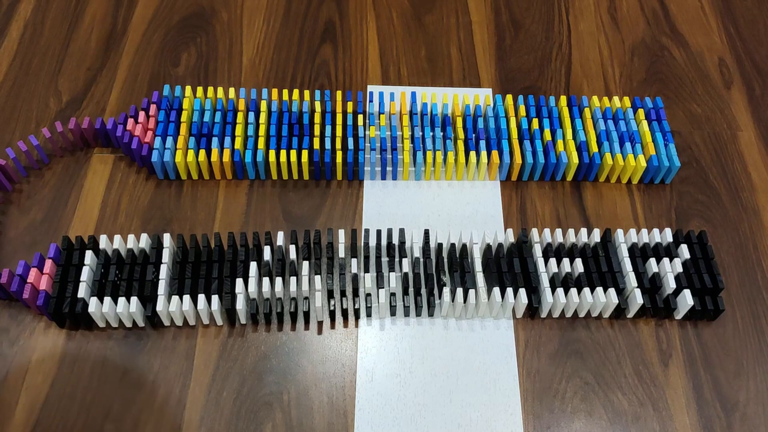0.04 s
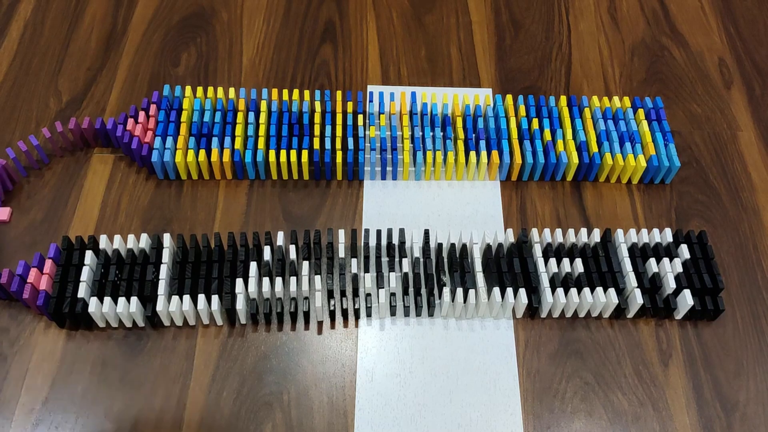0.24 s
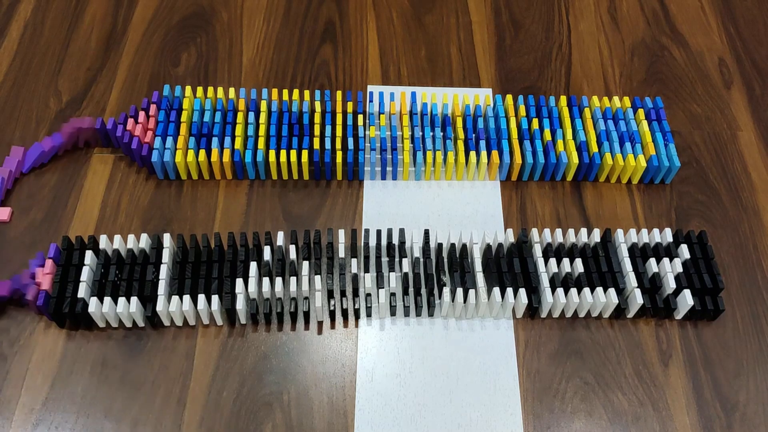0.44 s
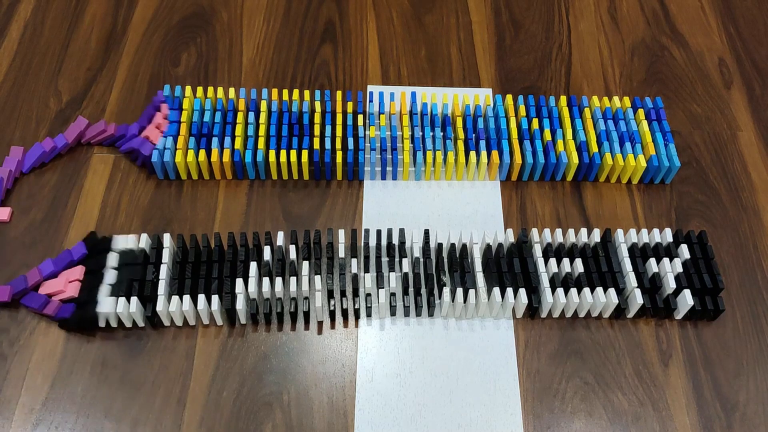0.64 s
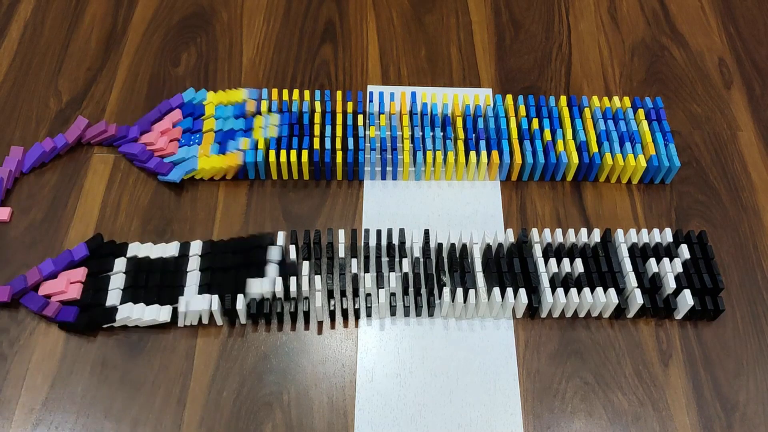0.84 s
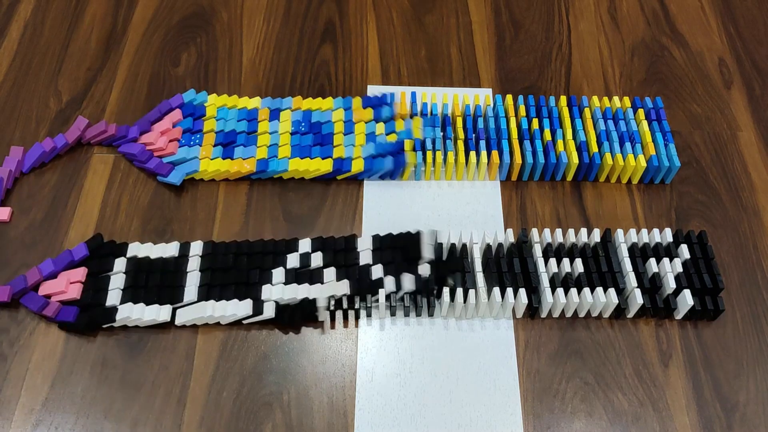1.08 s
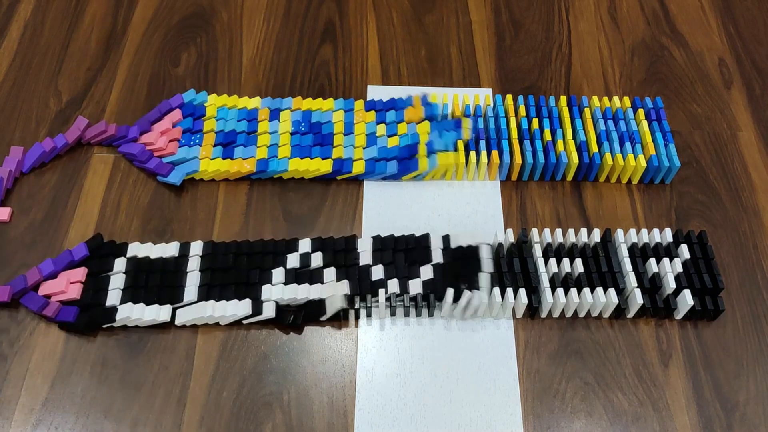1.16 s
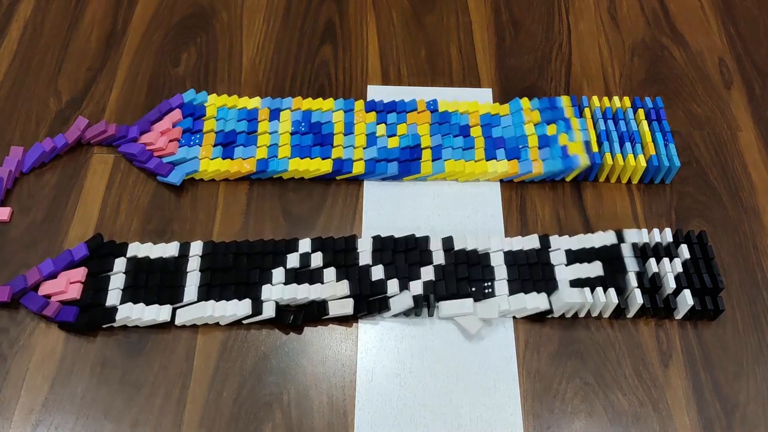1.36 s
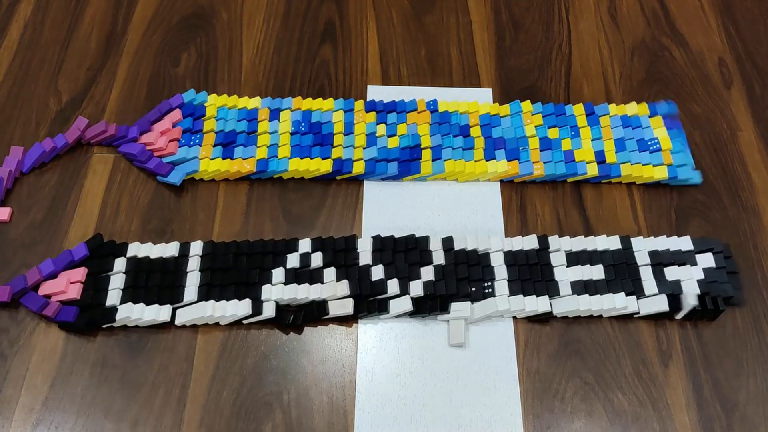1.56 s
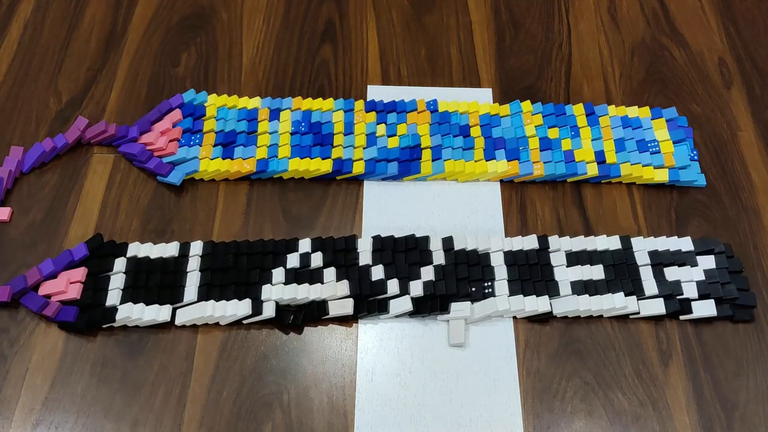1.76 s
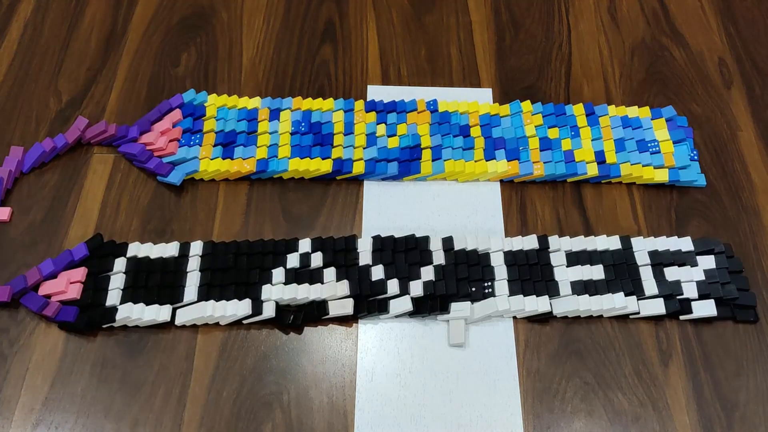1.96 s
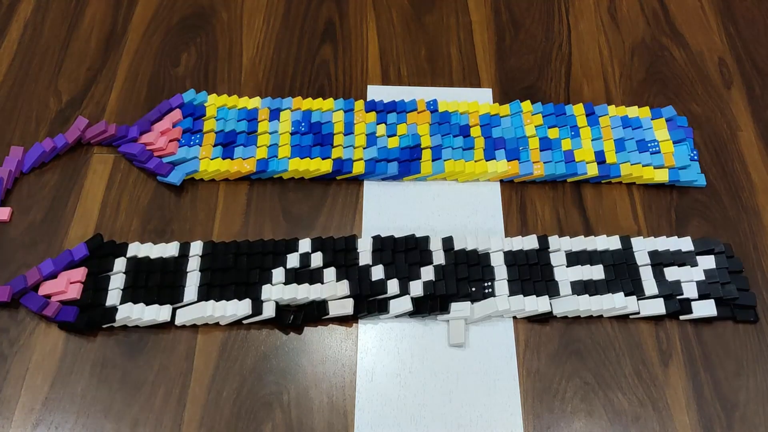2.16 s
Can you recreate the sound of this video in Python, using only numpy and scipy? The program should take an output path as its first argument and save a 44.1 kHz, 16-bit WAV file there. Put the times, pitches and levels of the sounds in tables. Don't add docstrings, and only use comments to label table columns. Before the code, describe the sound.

Near silence, then scattered domino clacks grow into a rushing wave of thousands of sharp plastic ticks and woody knocks, moving slightly from left to right in a live room, before a last tile settles over low rumble.

```python
import sys
import numpy as np
from scipy import signal
from scipy.fft import rfft, irfft
from scipy.io import wavfile
from scipy.ndimage import uniform_filter1d

SR = 44100
rng = np.random.default_rng(int(sys.argv[2]) if len(sys.argv) > 2 else 0)


def attenuation_scalar(level_db):
    decades = np.asarray(level_db, float) / 20
    return 10 ** decades


def bounce(signal):
    frames = np.transpose(np.atleast_2d(signal))
    limited = np.clip(frames, -1, 1)
    pcm = np.round(limited * 32767).astype(np.int16)
    wavfile.write(sys.argv[1], SR, pcm)


N = 98034
TIME = np.arange(N) / SR


def evened(x):
    return x / np.sqrt(np.mean(x ** 2) + 1e-20)


def read(points, hz):
    f, value = np.transpose(points)
    return np.interp(np.log(hz + 1), np.log(f + 1), value)


def curve(table, axis):
    columns = np.transpose(table)
    return np.interp(TIME, columns[0], columns[axis])


def colour(x, points):
    count = x.shape[-1]
    gain = attenuation_scalar(read(points, np.fft.rfftfreq(count, 1 / SR)))
    return irfft(rfft(x) * gain, count)


def modes(table, tune):
    t = np.arange(3000) / SR
    out = 0
    for (hz, db, t60), k in zip(table, tune):
        out = out + attenuation_scalar(db - 60 * t / t60) * np.sin(2 * np.pi * hz * k * t)
    return out


LAG_START, LAG_END, LAG_SPREAD = -14, 10, 6
FAR_END_LAG, FAR_END_S = 9, 1.85


def both_ears(at, size, spread, far_end=False):
    lag = LAG_START + (LAG_END - LAG_START) * at / N + LAG_SPREAD * spread
    lag = FAR_END_LAG if far_end else lag
    left_at = np.clip(at + np.round(lag).astype(int), 0, N - 1)
    out = np.zeros((2, N))
    np.add.at(out[0], left_at, size)
    np.add.at(out[1], at, size)
    return out


# (time [s], effort [dB], tile ring [dB], floor thud [dB], edge sharpness [dB])
FALLING_WAVE = [(0, -100, -12, 12, -6), (.09, -81.5, -24, 7, -29), (.2, -64, 4.5, 3, 15),
                (.27, -51, -4, 2, -17), (.36, -59.5, -19, 6, -30), (.4, -52, 5, 4, -26),
                (.49, -60, -29, 13, -29), (.615, -45.5, 1.5, 6.5, -8), (.79, -44, -35, 4, -9),
                (.92, -32, -1.5, 0, -14), (1.05, -29, -4, -3.5, 3), (1.2, -29, -0.5, 3, -6),
                (1.33, -27, -1.5, -3, -29), (1.42, -27.5, 5, 0.5, 6.5), (1.57, -26, -6.5, -2.5, -16),
                (1.66, -29, -1, 1.5, 10), (1.73, -27.5, 5.5, 6, 14), (1.8, -40.5, 7, -3.5, -5)]
# (frequency [Hz], density [dB per Hz])
TICK_COLOUR = [(530, -19.5), (900, -8.5), (2300, -2), (3200, -4.5), (4040, -5), (5180, -7.5), (6500, -10.5),
               (15500, -27.5)]
# (frequency [Hz], level [dB], time to fade by 60 dB [s])
TILE_TONES = [(2195, -9, 0.037), (3550, 0, 0.023), (4044, 1.5, 0.083), (4330, 1.5, 0.027),
              (6130, -5, 0.046), (6600, 9, 0.0094), (8060, -1, 0.025), (11820, -9.5, 0.045)]
# (frequency [Hz], level [dB], time to fade by 60 dB [s])
BOARD_TONES = [(290, -16, 0.04), (470, -1, .03), (610, 8, 0.028), (720, 7, 0.02), (820, 8, 0.022),
               (930, 3, .025)]
# (time [s], pitch [-1 to 1])
BOARD_PITCH = [(0, -.4), (.47, -.4), (.495, .6), (.75, .1), (.85, -.5), (1.05, .4), (1.2, -.3), (1.5, .4),
               (1.6, -.4), (1.9, -.3), (2.2, 0)]
WAVE_END_S, WAVE_STOP_DB_PER_S = 1.884, -300
KNOCKS_PER_S, SIZE_SPREAD_DB = 6000, 2.5
RING_DB, THUD_DB, EDGE_DB, EDGE_HZ = -5.5, -10.5, -22, 8700
TILE_DETUNE, BOARD_DETUNE, BOARD_RANGE = 0.0172, 0.017, 0.12
SURGE_DB, SURGE_S = 1.83, 0.011
KINDS = 30


def field():
    count = 14000
    at = (np.cumsum(rng.exponential(1, count)) * SR / KNOCKS_PER_S).astype(int)
    size = attenuation_scalar(SIZE_SPREAD_DB * np.minimum(rng.exponential(1, count), 5))
    size = size * rng.choice([-1., 1.], count) * (at < N)
    at = np.minimum(at, N - 1)
    spread, kind = rng.standard_normal((2, count))
    kind = 14.5 + 10 * curve(BOARD_PITCH, axis=1)[at] + 7 * kind
    kind = np.clip(np.round(kind), 0, KINDS - 1)

    tick, ring, thud = np.zeros((3, 2, N))
    for k in range(KINDS):
        train = both_ears(at[kind == k], size[kind == k], spread[kind == k])
        grain = rng.standard_normal(64) * attenuation_scalar(-60 * np.arange(64) / SR / 0.0033)
        grain = grain / np.linalg.norm(grain)
        tile = modes(TILE_TONES, 1 + TILE_DETUNE * rng.standard_normal(len(TILE_TONES)))
        board_tune = 1 + BOARD_RANGE * (k / 12.7 - 1)
        board_tune = board_tune + BOARD_DETUNE * rng.standard_normal(len(BOARD_TONES))
        board = modes(BOARD_TONES, board_tune)
        tick += signal.oaconvolve(train, grain[None])[:, :N]
        ring += signal.oaconvolve(train, tile[None])[:, :N]
        thud += signal.oaconvolve(train, board[None])[:, :N]

    width = max(round(SURGE_S * SR), 1)
    surge = uniform_filter1d(rng.standard_normal(N), width)
    surge = evened(uniform_filter1d(surge, width))
    tick = tick * attenuation_scalar(SURGE_DB * surge)
    edge = colour(tick, [(0.087 * EDGE_HZ, -35), (EDGE_HZ, 0), (15500, -2)])

    clatter = evened(colour(tick, TICK_COLOUR))
    clatter = clatter + attenuation_scalar(RING_DB + curve(FALLING_WAVE, axis=2)) * evened(ring)
    clatter = clatter + attenuation_scalar(THUD_DB + curve(FALLING_WAVE, axis=3)) * evened(thud)
    clatter = clatter + attenuation_scalar(EDGE_DB + curve(FALLING_WAVE, axis=4)) * evened(edge)
    stop_db = WAVE_STOP_DB_PER_S * np.maximum(TIME - WAVE_END_S, 0)
    return attenuation_scalar(curve(FALLING_WAVE, axis=1) + stop_db) * clatter


# (time [s], peak [dB], ring [Hz], tumble length [s], sharpness [dB])
SINGLE_CLACKS = [(0.072, -79, 3450, .002, -6), (.111, -70, 8000, .002, 4), (.166, -64, 8250, .002, -4),
                 (0.194, -59, 6450, .004, 0), (0.333, -64, 12350, .002, -3), (.372, -46, 12500, .0015, 3),
                 (.5505, -44, 9000, .002, 0), (.3935, -61, 14100, 0.0013, 3), (.6158, -47, 13000, .002, 11),
                 (.7385, -42, 11600, .01, -9), (.655, -33, 9500, .045, -17),
                 (.798, -34.5, 11500, .002, -15), (0.8185, -37, 10500, .002, -4),
                 (0.834, -39, 10800, 0.0045, -6), (1.68, -11.5, 5370, 0.085, 3),
                 (1.8633, -12, 4450, 0.0011, -5), (1.9824, -40, 10800, 0.00042, 7),
                 (1.984, -37.5, 6600, .014, 8.5), (1.99, -50.5, 840, .07, -30),
                 (2.074, -56.5, 310, 0.031, -30)]
# (frequency [Hz], density [dB per Hz])
SNAP_COLOUR = [(600, -24), (2500, -9), (4500, 0), (7500, -1), (10000, -8), (15500, -10), (16500, -30)]
CONTACTS, CONTACT_DETUNE, CONTACT_FADE_DB = 7, .2, -1.2
RISE_CYCLES, SNAP_T60_S, TUMBLE_S = 5.6, .005, .004


def clacks():
    ring, snap = np.zeros((2, 2, N))
    t = np.arange(1000) / SR
    draws = rng.random((len(SINGLE_CLACKS), CONTACTS))
    ticks = rng.standard_normal((len(SINGLE_CLACKS), CONTACTS, 1000))
    for (s, db, hz, length, sharp_db), draw, tick in zip(SINGLE_CLACKS, draws, ticks):
        rise = t * hz / RISE_CYCLES
        swell = (rise * np.exp(1 - rise)) ** 2
        for k in range(CONTACTS):
            at = round((s + length * (k + 1.1 * draw[k]) / CONTACTS) * SR)
            size = attenuation_scalar(db + CONTACT_FADE_DB * k)
            train = both_ears(np.array([at]), size, 0, s > FAR_END_S)[:, at - 50:at + 50]
            detune = CONTACT_DETUNE * (k > 0) * (draw[k - 1] - .5)
            tone = np.sin(2 * np.pi * hz * (1 + detune) * t) * swell
            if k > 0:
                tone = tone * min((length / TUMBLE_S) ** 2, 1)
            crack = attenuation_scalar(sharp_db - 60 * t / SNAP_T60_S) * tick[k]
            ring[:, at - 50:at + 1049] += signal.fftconvolve(train, tone[None])
            snap[:, at - 50:at + 1049] += signal.fftconvolve(train, crack[None])
    return ring + colour(snap, SNAP_COLOUR)


# (time [s], peak [dB], ring [Hz])
EDGE_HITS = [(.3728, -36, 5000), (.3735, -39, 7500), (.3767, -40, 4800), (.3817, -42, 5000),
             (.388, -43, 4800), (.3892, -44, 5200), (.3939, -48, 1000), (.3957, -42, 6700),
             (.3973, -42, 4200), (.4955, -51, 7800), (.5227, -47, 9000), (.551, -42, 4400),
             (.5803, -44, 9500), (.6157, -33, 6500), (.6168, -41, 3800), (.7703, -36, 8000),
             (.8075, -34, 7000), (.8574, -30, 6500), (.8875, -26, 4100), (.9118, -26, 6000),
             (.9291, -23, 4800), (1.017, -21, 6800), (1.1173, -20, 6000), (1.2524, -18, 5700),
             (1.2846, -18, 6600), (1.2987, -18, 5700), (1.3404, -18, 6400), (1.3681, -18, 6800),
             (1.4157, -17, 5600), (1.4538, -17, 7500), (1.5259, -18, 6000), (1.5513, -18, 6600),
             (1.5785, -15, 4400), (1.6247, -18, 6400), (1.6515, -18, 5700), (1.6588, -17, 6600),
             (1.6828, -14, 5500), (1.6852, -18, 6600), (1.6955, -18, 6400), (1.7068, -13, 4600),
             (1.7082, -13, 6000), (1.7101, -8, 5200), (1.7118, -10, 5600), (1.7131, -9, 4600),
             (1.7143, -12, 4000), (1.7167, -13, 3900), (1.7192, -13, 4000), (1.7235, -17, 5200),
             (1.7278, -11, 5500), (1.729, -7, 6500), (1.7302, -7, 5600), (1.7316, -8, 5000),
             (1.7385, -14, 5600), (1.76, -17, 5400), (1.7745, -23, 5800), (1.8428, -26, 4250),
             (1.8988, -32, 5800), (1.9265, -27, 4300), (1.9828, -27, 3400), (1.9857, -33, 6100)]
BLIP_CYCLES, BLIP_SNAP_DB, BLIP_SNAP_T60_S = 1.6, -14, .005


def blips():
    out, snap = np.zeros((2, 2, N))
    t = np.arange(-100, 200) / SR
    draws = rng.standard_normal((len(EDGE_HITS), 2))
    ticks = rng.standard_normal((len(EDGE_HITS), 2, 300))
    for (s, db, hz), (place, phase), tick in zip(EDGE_HITS, draws, ticks):
        at = round(s * SR)
        train = both_ears(np.array([at]), attenuation_scalar(db), .5 * place, s > FAR_END_S)[:, at - 50:at + 50]
        tone = np.cos(2 * np.pi * hz * t + phase) * np.exp(-(t * hz / BLIP_CYCLES) ** 2)
        crack = attenuation_scalar(BLIP_SNAP_DB - 60 * abs(t) / BLIP_SNAP_T60_S) * tick
        out[:, at - 150:at + 249] += signal.fftconvolve(train, tone[None])
        snap[:, at - 150:at + 249] += signal.fftconvolve(train, crack, axes=1)
    return out + colour(snap, SNAP_COLOUR)


# (time [s], level [dB], ring [Hz])
LAST_TILE = [(1.83, -20, 4250), (1.859, -31, 4180), (1.863, -55, 4210), (1.869, -18.5, 4390),
             (1.89, -35, 4315), (1.93, -39.5, 4404), (1.975, -49.5, 4390), (1.986, -37.5, 4660),
             (2.012, -43, 4920), (2.02, -58, 4770), (2.03, -48, 4650), (2.08, -56, 4660), (2.15, -76, 4650),
             (2.22, -88, 4700)]
RATTLE_PER_S, RATTLE_WIDTH_HZ, RATTLE_DB = 600, 230, -4.5
RATTLE_OVERTONE, OVERTONE_DB = 1.85, -20


def rattle():
    taps = rng.random(N) < RATTLE_PER_S / SR
    taps = taps * attenuation_scalar(1.9 * np.minimum(rng.exponential(1, N), 3))
    r = np.exp(-np.pi * RATTLE_WIDTH_HZ / SR)
    ring = 0
    for ratio, db in ((1, 0), (RATTLE_OVERTONE, OVERTONE_DB)):
        turn = np.exp(2j * np.pi * np.cumsum(ratio * curve(LAST_TILE, axis=2)) / SR)
        smooth = signal.lfilter([1 - r], [1, -r], taps / turn)
        smooth = signal.lfilter([1 - r], [1, -r], smooth)
        ring = ring + attenuation_scalar(db) * evened((turn * smooth).real)
    start = np.clip((TIME - LAST_TILE[0][0]) / 0.015, 0, 1)
    ring = ring * attenuation_scalar(RATTLE_DB + curve(LAST_TILE, axis=1)) * start
    return np.array([np.roll(ring, FAR_END_LAG), ring])


# (frequency [Hz], time to fade by 60 dB [s])
ROOM_FADE = [(250, 0.62), (1000, 0.59), (3000, 0.64), (6000, 0.5), (12000, 0.35)]
ROOM_TURNS = 1.6


def room(x):
    out = 0
    for k in range(3):
        taps = np.zeros((2, SR))
        at = np.arange(120, SR - 20, 20) + rng.integers(0, 20, (2, (SR - 121) // 20))
        np.put_along_axis(taps, at, rng.choice([-1., 1.], at.shape), 1)
        hz, t, z = signal.stft(taps, SR, nperseg=256)
        same = np.clip(1 - hz / 1600, 0, 1)[:, None] ** 1.68
        z[1] = same * z[0] + np.sqrt(1 - same ** 2) * z[1]
        decay = attenuation_scalar(-60 * t / read(ROOM_FADE, hz)[:, None])
        tail = signal.istft(z * decay, SR, nperseg=256)[1]
        tail = tail / np.linalg.norm(tail[0])
        share = np.sqrt(2 / 3) * np.cos(np.pi * (ROOM_TURNS * TIME + k / 3))
        out = out + signal.fftconvolve(share * x, tail, axes=1)[:, :N]
    return out


# (time [s], level [dB])
RUMBLE_LEVEL = [(0.0, -71), (0.15, -66), (0.44, -53), (0.83, -50.5), (0.85, -57), (0.98, -44),
                (1.61, -43.5), (1.64, -41.5), (1.82, -48), (1.93, -40.5), (2.01, -38.5), (2.05, -42),
                (2.16, -42.5), (2.22, -43.5)]
# (frequency [Hz], density [dB per Hz])
RUMBLE_COLOUR = [(8.8, -30), (15, 10.5), (48, -9.5), (105, -16.5), (145, -23.5), (220, -23), (290, -39),
                 (480, -120)]
# (frequency [Hz], level [dB])
HUM_LINES = [(32, -5), (63, -12)]
# (frequency [Hz], density [dB per Hz])
AIR_COLOUR = [(35, -25), (60, 8.5), (105, -1), (287, -52), (579, -49), (767, -65), (1910, -42), (7940, -51),
              (15800, -36), (16300, -98)]
# (frequency [Hz], density [dB per Hz])
HISS_COLOUR = [(2000, -15), (6000, 0), (15000, -1), (15900, -3), (16300, -50)]
AIR_DB, HISS_DB = -65.5, -73
FADE_S, FADE_FROM_DB = 0.28, -31


def background():
    low = rng.standard_normal(N) + 0.19 * rng.standard_normal((2, N))
    low = evened(colour(low, RUMBLE_COLOUR))
    hum = sum(attenuation_scalar(db) * np.sin(2 * np.pi * (hz * TIME + rng.random())) for hz, db in HUM_LINES)
    air = rng.standard_normal(N) + 0.33 * rng.standard_normal((2, N))
    air = attenuation_scalar(AIR_DB) * evened(colour(air, AIR_COLOUR))
    hiss = attenuation_scalar(HISS_DB) * evened(colour(rng.standard_normal((2, N)), HISS_COLOUR))
    fade = attenuation_scalar(FADE_FROM_DB * np.clip(1 - TIME / FADE_S, 0, 1))
    return attenuation_scalar(curve(RUMBLE_LEVEL, axis=1)) * (attenuation_scalar(-3.5) * low + hum) + fade * (air + hiss)


# (frequency [Hz], level [dB])
MICROPHONE = [(60, -17), (200, -14.5), (400, 2), (15800, 5.5), (16400, -59)]
FIELD_DB, ROOM_DB, SINGLE_ROOM_DB, LEFT_DB = 0.5, -1.5, -4, -0.75


def scene():
    mass = attenuation_scalar(FIELD_DB) * field()
    single = clacks() + blips() + rattle()
    echoes = attenuation_scalar(ROOM_DB) * room(mass + attenuation_scalar(SINGLE_ROOM_DB) * single)
    tiles = colour(mass + single + echoes, MICROPHONE)
    return (tiles + background()) * attenuation_scalar(np.array([[LEFT_DB], [0]]))


def band_limit(x):
    return signal.sosfilt(signal.butter(12, 16150, fs=SR, output="sos"), x)


def record(dry):
    ceiling = .95
    mix = ceiling * np.tanh(dry / ceiling)
    return band_limit(mix)


dry = scene()
out = record(dry)
bounce(out)
```